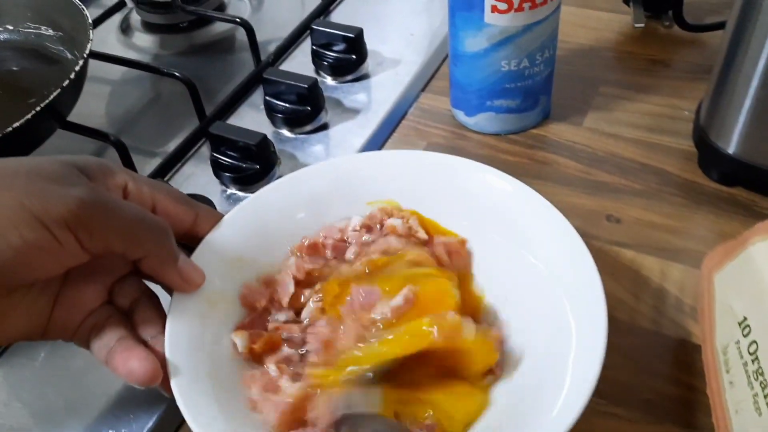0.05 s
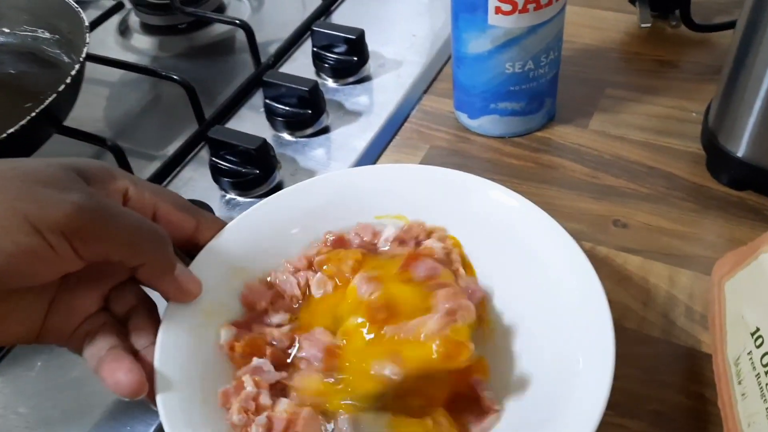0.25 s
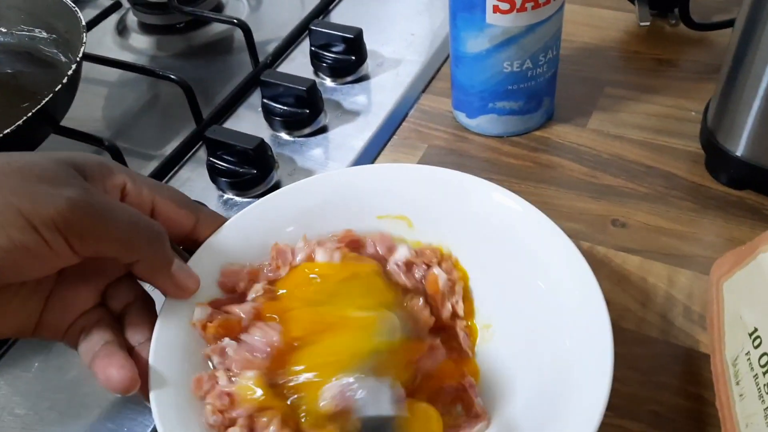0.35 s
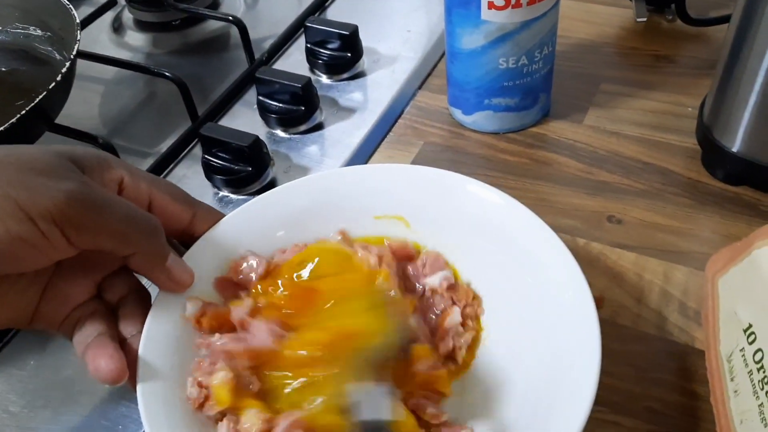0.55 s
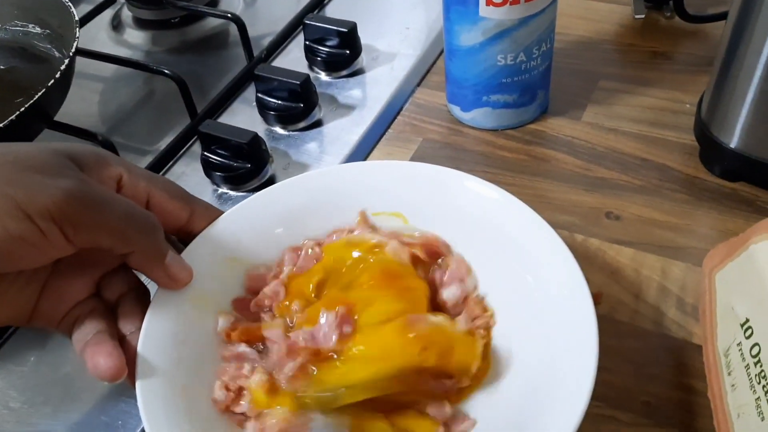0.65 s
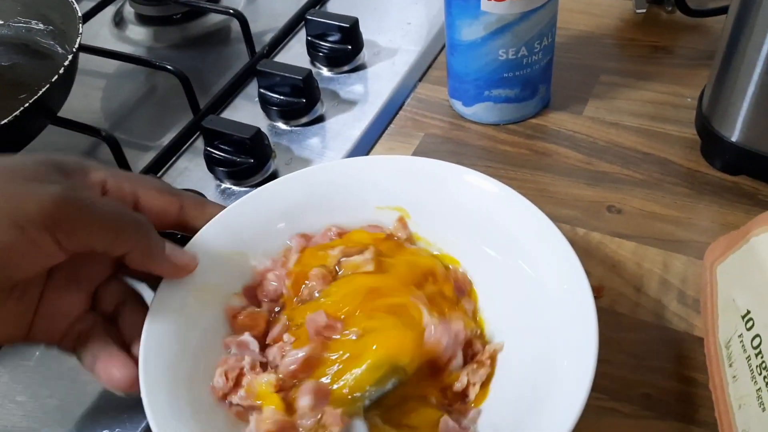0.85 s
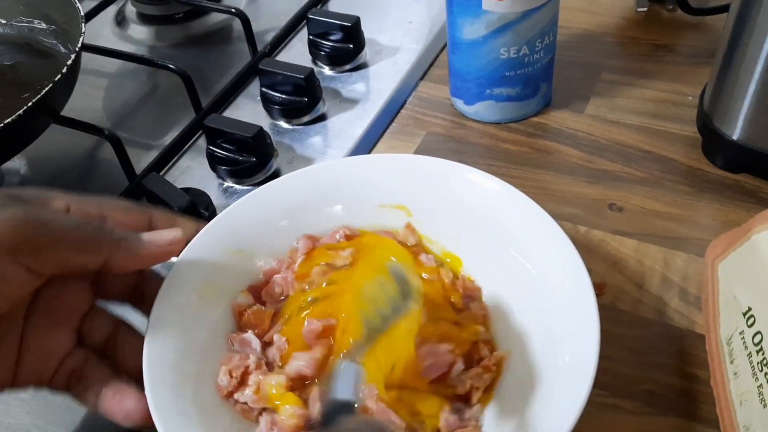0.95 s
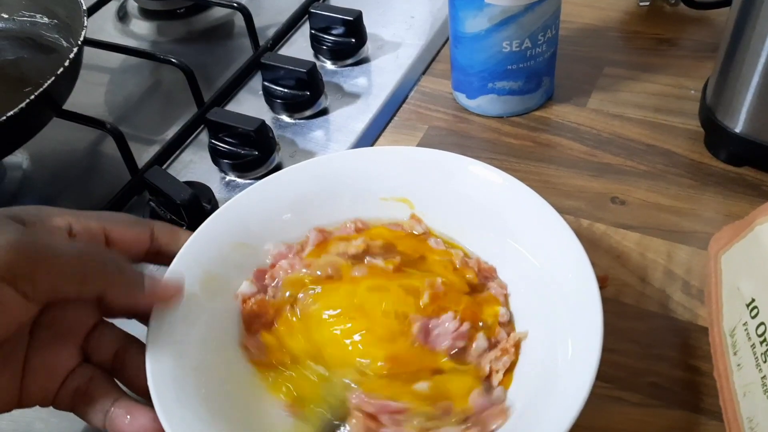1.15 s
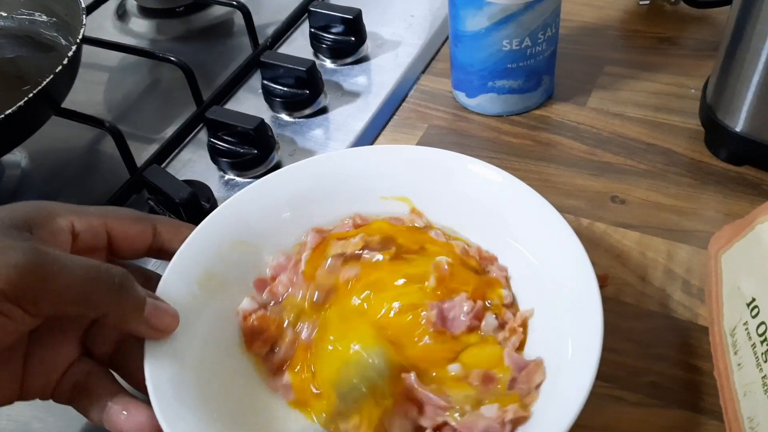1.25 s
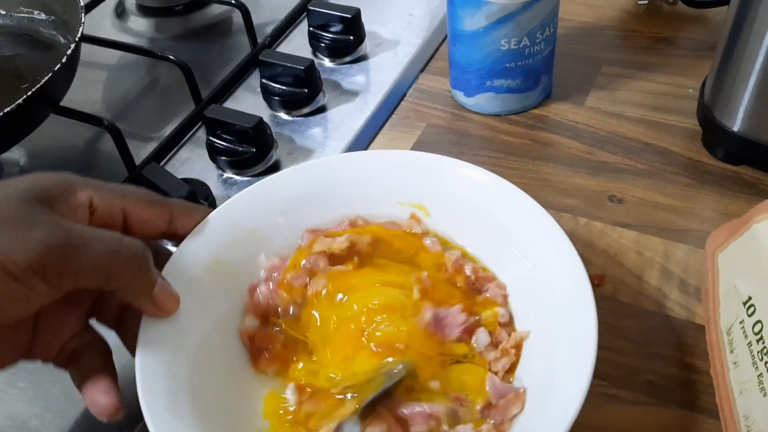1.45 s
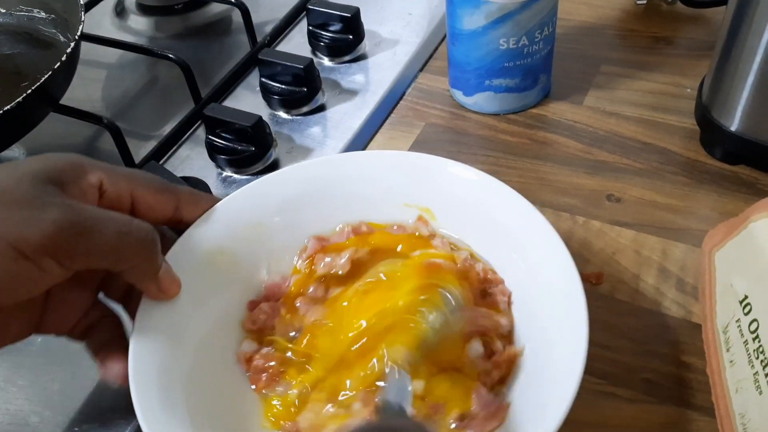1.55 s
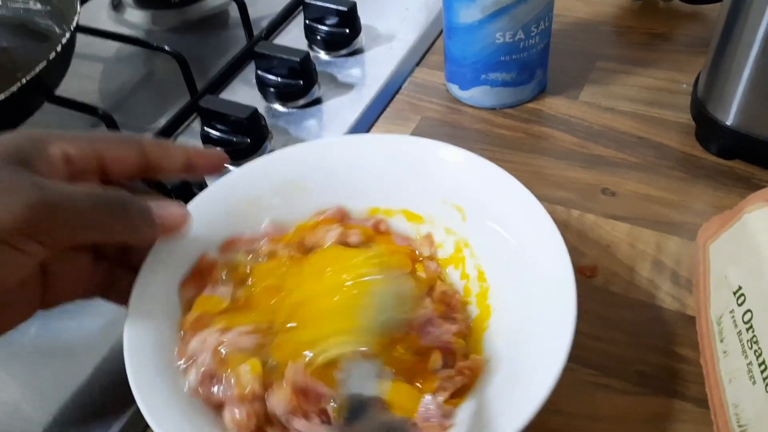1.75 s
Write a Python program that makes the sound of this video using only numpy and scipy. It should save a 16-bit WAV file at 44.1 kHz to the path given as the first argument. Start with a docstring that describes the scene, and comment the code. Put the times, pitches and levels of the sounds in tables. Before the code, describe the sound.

A metal fork beats eggs and diced meat in a ceramic bowl, close up, ticks mostly left. Irregular bright ticks run from 0.03 to 0.82 seconds, strongest near 0.24 and 0.46, with wet slop, a loud double plop at 0.5 and soft wooden thumps. After a lull, a clink rings at 1.12. Faint plops, scraping and light ticks follow around 1.5-1.8. Short kitchen echoes, low steady hum.

```python
"""A metal fork ticks on a ceramic bowl from the start, amid the wet slop of a thick mix, over a soft steady hum.
The fork beats eggs and diced meat; the bowl is held on a wooden worktop in a small kitchen.
Hum and slop are coloured noise and tiny ringing grains; ticks and scrapes are shaped noise.
Air pockets plop as rising tones with splatter and bowl modes; low modes make the worktop boom.
A close pair of microphones hears it all, with echoes made from fading noise."""
import sys
import numpy as np
from scipy import signal
from scipy.fft import rfft, irfft
from scipy.io import wavfile

SR = 44100
rng = np.random.default_rng(int(sys.argv[2]) if len(sys.argv) > 2 else 0)


def store_wav(level_fs):
    """Save 16-bit WAV to argv[1]."""
    pcm = np.round(np.clip(np.atleast_2d(level_fs), -1, 1) * 32767)
    wavfile.write(sys.argv[1], SR, pcm.T.astype(np.int16))


def to_linear_factor(level_db):
    """Convert decibel levels (scalar or array-like) to linear amplitude factors."""
    exponent = np.asarray(level_db, float) / 20
    return 10 ** exponent


N = 79380  # length in samples, 1.8 s


def rms_one(x):
    """Scale a sound so that its average strength (rms) is 1."""
    return x / np.sqrt(np.mean(x ** 2) + 1e-20)


def at_hz(points, hz):
    """Read a table between its points, on a log-frequency axis."""
    table_hz, values = np.transpose(points)
    return np.interp(np.log(np.maximum(hz, 1)), np.log(table_hz), values)


def shaped(x, spectrum, tilt_db=0):
    """Colour a sound by a spectrum, plus a tilt in dB per octave that pivots at 4 kHz."""
    size = x.shape[-1]
    hz = np.arange(size // 2 + 1) * SR / size
    tilt = tilt_db * np.log2(np.clip(hz, 300, None) / 4000)
    return irfft(rfft(x) * to_linear_factor(at_hz(spectrum, hz) + tilt), size)


def ring(clicks, hz, t60):
    """A resonance: each unit click starts a sine of height 1 that falls 60 dB in t60 (at least 2 ms)."""
    shrink = to_linear_factor(-60 / (max(t60, 0.002) * SR))  # loss per sample
    turn = 2 * np.pi * hz / SR
    feedback = [1, -2 * shrink * np.cos(turn), shrink * shrink]
    return signal.lfilter([0, np.sin(turn)], feedback, clicks + 1e-18)


def add(out, x, start_s, pan_db):
    """Place a sound at a time; pan_db is how much louder the left is than the right."""
    i = int(start_s * SR)
    out[:, i:i + len(x)] += x[:N - i] * to_linear_factor([[pan_db / 2], [-pan_db / 2]])


def right_late(x, lead_s):
    """Sound reaches the right microphone later: delay that channel by lead_s seconds."""
    bins = np.arange(N // 2 + 1)
    delay = np.exp(-2j * np.pi * lead_s * SR * bins / N)
    return np.array([x[0], irfft(rfft(x[1]) * delay, N)])


# How alike left and right are when sound comes from all around.
# Each row: frequency in Hz, likeness (0 unrelated, 1 identical).
LIKENESS = [(60, 0.42), (200, 0.91), (500, 0.41), (1000, 0)]


def diffuse(size):
    """Noise from all around: left and right share the bass and differ in the treble."""
    mid, side = rfft(rng.standard_normal((2, size)))
    alike = np.clip(at_hz(LIKENESS, np.arange(size // 2 + 1) * SR / size), -1, 1)
    both = np.sqrt(1 + alike) * mid + np.sqrt(1 - alike) * side * [[1], [-1]]
    return irfft(both, size) / np.sqrt(2)


# Colour of the room hum. Each row: frequency in Hz, relative level in dB per Hz.
HUM_COLOUR = [(100, -2.5), (350, 4.5), (560, -24), (750, -14), (1000, -15), (1900, -22), (2800, -8),
              (4000, -23), (6500, -10), (10000, -21)]


def hum():
    """Steady quiet room sound: coloured noise from all around."""
    level_db = -63
    return to_linear_factor(level_db) * rms_one(shaped(diffuse(N), HUM_COLOUR))


# Loudness of the mix moving under the fork. Each row: time in seconds, level in dB.
SLOP_LEVEL = [(0, -50.5), (0.089, -59), (0.118, -46), (0.198, -55), (.3, -48.5), (.42, -53.5),
              (0.482, -34.5), (.54, -43), (.62, -43), (.72, -64), (0.799, -59), (.95, -69), (1.06, -110),
              (1.17, -54), (1.27, -64.5), (1.5, -65), (1.6, -63), (1.67, -50.5), (1.8, -55.5)]
# Colour of the wet mix, also used for the splatter of the plops.
# Each row: frequency in Hz, relative level in dB per Hz.
WET_COLOUR = [(150, -48), (300, -0.5), (545, -24.5), (612, -5.5), (1310, -8.5), (16000, -48.5)]


def slop():
    """Dense wet grains, each a short decaying ring, get louder and softer with the stirring."""
    grains_per_s, size_db, cycles = 3000, 5, 2.8  # cycles sets how long a grain rings
    sizes = to_linear_factor(size_db * np.minimum(rng.exponential(1, N), 5)) * rng.choice([-1, 1], N)
    sizes = sizes * (rng.random(N) < grains_per_s / SR)
    pitches = np.geomspace(200, 15000, 24)  # Hz
    dealt = rng.integers(0, 24, N)  # which pitch each grain gets
    rings = np.zeros(N)
    for k, hz in enumerate(pitches):
        grains = rms_one(ring(sizes * (dealt == k), hz, cycles / hz))
        rings += grains * np.sqrt(hz) * to_linear_factor(at_hz(WET_COLOUR, hz))  # root: wider bands hold more
    times, db = np.transpose(SLOP_LEVEL)
    return to_linear_factor(np.interp(np.arange(N) / SR, times, db)) * rms_one(rings)


# How long echoes last. Each row: frequency in Hz, time to fall 60 dB in seconds.
ROOM_T60 = [(80, 0.46), (210, 0.3), (1470, 0.22), (10200, 0.27)]
# Colour of the echoes. Each row: frequency in Hz, level in dB.
ROOM_COLOUR = [(60, -6), (500, 3), (3000, 7)]


def kitchen(x):
    """Walls return many overlapping echoes: noise that dies away at its own rate in each band."""
    level_db, gap_s = -6.5, 0.001
    t = np.arange(SR // 2) / SR
    edges = 50 * 2 ** np.arange(0, 8.6, 0.7)  # band edges, Hz
    white = diffuse(len(t)), diffuse(len(t))  # neighbouring bands take turns
    tail = 0
    for k, (low, high) in enumerate(zip(edges, edges[1:])):
        hz = np.sqrt(low * high)
        band_filter = signal.butter(2, [low, high], "band", fs=SR, output="sos")
        band = signal.sosfilt(band_filter, white[k % 2])
        tail = tail + band * to_linear_factor(at_hz(ROOM_COLOUR, hz) - 60 * t / at_hz(ROOM_T60, hz))
    tail = tail * np.clip(t / gap_s - 1, 0, 1)  # silent for one gap, then fades in over another
    return to_linear_factor(level_db) * signal.fftconvolve(x[None], tail / np.sqrt(0.02 * SR), axes=1)[:, :N]


# Tines touching the glaze. Each row: start in seconds, level in dB, left over right in dB,
# treble tilt in dB per octave.
TICKS = [(0.0354, -25, 5.5, 5), (0.0765, -20.5, 8, 4), (0.236, -11, 10.5, 3), (0.2948, -22.5, 1, 0),
         (0.357, -28, -2, 3), (0.438, -32, 14, -1), (0.4574, -12, 7, 3), (0.6094, -28.5, 15, 2),
         (0.6834, -16, 13.5, 2), (0.796, -29, 3.5, 0.5), (0.821, -17.5, 14, 5), (1.102, -37.5, 7.5, 8),
         (1.1238, -18.5, 10, 8), (1.6413, -27, 9.5, 7.5), (1.6893, -41.5, 20.5, 7)]
# Colour of a tick. Each row: frequency in Hz, relative level in dB per Hz.
TICK_COLOUR = [(300, -23), (1170, 2), (1640, -4.5), (2360, 7), (3350, -13), (6000, -5.5), (7200, -13),
               (8500, -7.5), (9550, -18), (11500, -14.5), (16000, -14)]


def ticks():
    """Short bursts of tine chatter as noise; also the bare knocks that the walls return."""
    rise_s, t60_s, echo_db = 0.00076, 0.018, 13
    out, knocks = np.zeros((2, N)), np.zeros((2, N))
    t = np.arange(4096) / SR
    shape = (1 - np.exp(-t / rise_s)) ** 2 * to_linear_factor(-60 * t / t60_s)
    click = np.eye(1, len(t), k=64)[0]
    for start_s, db, pan_db, tilt_db in TICKS:
        chatter = rms_one(shaped(rng.standard_normal(len(t)), TICK_COLOUR, tilt_db))
        add(out, to_linear_factor(db) * shape * chatter, start_s, pan_db)
        knock = shaped(click, TICK_COLOUR, tilt_db)
        knock = knock / np.sqrt(np.sum(knock ** 2))  # unit energy
        add(knocks, to_linear_factor(db + echo_db) * knock, start_s, 0)
    return out, knocks[0]


# Air pockets closing in the mix. Each row: start in seconds, level in dB, starting pitch in Hz,
# time to fall 60 dB in seconds.
PLOPS = [(0.059, -36, 1883, 0.15), (0.074, -33, 1395, 0.083), (0.098, -34, 367, 0.081),
         (0.238, -24.5, 329.8, 0.22), (0.245, -13, 405, 0.043), (0.362, -24, 324, 0.075),
         (0.456, -32, 242, 0.086), (0.498, -4, 602, 0.025), (0.5, -14, 1450, 0.026),
         (0.506, -4.5, 318, 0.026), (0.5165, -24, 746, 0.018), (0.632, -28, 1950, 0.019),
         (0.6407, -12, 447, 0.025), (0.683, -14.5, 1180, 0.018), (0.694, -22.5, 336, 0.043),
         (0.712, -30, 2180, 0.035), (0.813, -27, 894, 0.052), (0.821, -21, 1705, 0.014),
         (0.925, -36, 306.5, 0.061), (1.104, -45.5, 1043, 0.056), (1.124, -28.5, 311, 0.055),
         (1.126, -34, 734, 0.06), (1.255, -47, 1150, 0.025), (1.298, -53, 2050, 0.025),
         (1.576, -45, 2550, 0.01), (1.526, -40.5, 575, 0.034), (1.542, -37, 348, 0.068),
         (1.573, -39.5, 333, 0.05), (1.619, -37.5, 385, 0.032), (1.634, -40.5, 370, 0.05),
         (1.774, -43.5, 360, 0.21)]
# Tones of the bowl, damped by the mix. Each row: frequency in Hz, level in dB,
# time to fall 60 dB in seconds.
BOWL = [(343.4, -15.5, 0.065), (480, -15.5, 0.039), (576, -21, 0.088), (780.4, -19.5, 0.069),
        (1028, -9.5, 0.017), (1420, -28, 0.027)]


def plops():
    """Each pocket rings briefly with rising pitch, splatters, and knocks the bowl."""
    rise_per_s, attack_s, pan_db = 4.3, 0.001, 3
    splat_db, splat_t60_s, bowl_scatter_db = -12.5, 0.043, 0.5
    out, t = np.zeros((2, N)), np.arange(SR // 2) / SR
    click = np.eye(1, len(t))[0]
    modes = np.array([to_linear_factor(db) * ring(click, hz, t60) for hz, db, t60 in BOWL])
    attack = 1 - np.exp(-t / attack_s)
    stretch = 1 + rise_per_s * np.minimum(t, 0.1)  # runs the phase ahead, so the pitch climbs
    for start_s, db, hz, t60 in PLOPS:
        pocket = np.sin(2 * np.pi * hz * t * stretch) * to_linear_factor(-60 * t / t60)
        white = rng.standard_normal(len(t))
        splat = to_linear_factor(splat_db - 60 * t / splat_t60_s) * rms_one(shaped(white, WET_COLOUR))
        strength = to_linear_factor(bowl_scatter_db * rng.standard_normal(len(modes)))
        bowl = (strength * rng.choice([-1, 1], len(modes))) @ modes
        add(out, to_linear_factor(db) * attack * (pocket + splat + bowl), start_s, pan_db)
    return out


# The bowl rocking on the worktop. Each row: start in seconds, level in dB.
THUMPS = [(0.11, -49), (0.242, -32.5), (0.282, -35.5), (0.459, -40), (0.508, -31), (0.549, -34),
          (0.649, -36.5), (0.712, -40.5), (0.831, -39), (.87, -41.5), (1.13, -40), (1.538, -45)]
# Low tones of the worktop. Each row: frequency in Hz, level in dB, time to fall 60 dB in seconds.
WORKTOP = [(106, 2.5, 0.18), (186, -9.5, 0.44), (69.5, -10.5, 0.12)]


def thumps():
    """Soft pushes set the low modes of the wooden worktop booming."""
    rise_s = 0.0089
    out, t = np.zeros((2, N)), np.arange(SR // 2) / SR
    for start_s, db in THUMPS:
        boom = np.zeros(len(t))
        for hz, mode_db, t60 in WORKTOP:
            phase = rng.uniform(0, 2 * np.pi)
            boom += to_linear_factor(mode_db - 60 * t / t60) * np.sin(2 * np.pi * hz * t + phase)
        add(out, to_linear_factor(db) * (1 - np.exp(-t / rise_s)) * boom, start_s, 0)
    return out


# Tines dragging over the glaze. Each row: start in seconds, length in seconds, level in dB.
SCRAPES = [(0.61, 0.016, -42), (1.117, 0.029, -38.5), (1.61, 0.35, -58.5)]
# Colour of a scrape. Each row: frequency in Hz, relative level in dB per Hz.
SCRAPE_COLOUR = [(1200, -19.5), (3900, 17), (5500, 6.5), (16000, -26.5)]
# A dragged tine singing faintly. Each row: start in seconds, length in seconds, level in dB.
SQUEAKS = [(1.01, 0.035, -67), (1.598, 0.2, -63)]


def scrapes():
    """Rough slips make noise or set a tine singing; each swells fast and fades over the stroke."""
    squeak_hz, squeak_t60_s = 3830, 0.03
    out = np.zeros((2, N))
    rough = rng.standard_normal(2 * N) * to_linear_factor(2.1 * rng.exponential(1, 2 * N))
    slips = rms_one(shaped(rough, SCRAPE_COLOUR))
    song = rms_one(ring(rough, squeak_hz, squeak_t60_s))
    for strokes, sound in (SCRAPES, slips), (SQUEAKS, song):
        for start_s, length_s, db in strokes:
            u = np.arange(int(length_s * SR)) / (length_s * SR)  # 0 to 1 along the stroke
            piece = sound[int(start_s * SR):][:len(u)]
            add(out, to_linear_factor(db) * np.sin(np.pi * u ** 0.21) * piece, start_s, 0)
    return out


# One touch that leaves the fork free to ring: start in seconds, level in dB, left over right in dB.
CLINK = (1.1245, -18.5, -7)
# Tones of the fork. Each row: frequency in Hz, level in dB, time to fall 60 dB in seconds.
FORK = [(6330, 4, 0.04), (6700, -14, 0.03)]


def clink():
    """The freed fork rings at two close modes, fading in over 1.3 ms."""
    start_s, db, pan_db = CLINK
    out, click = np.zeros((2, N)), np.eye(1, SR // 2)[0]
    fork = sum(to_linear_factor(mode_db) * ring(click, hz, t60) for hz, mode_db, t60 in FORK)
    fade_in = np.minimum(np.arange(SR // 2) / (0.0013 * SR), 1)
    add(out, to_linear_factor(db) * fork * fade_in, start_s, pan_db)
    return out


def scene():
    """Bowl sounds reach the left microphone first; the room answers, over the hum."""
    metal_lead_s, wet_lead_s = 0.000169, 0.00024
    chatter, knocks = ticks()
    metal = clink() + scrapes()
    wet = plops() + thumps() + slop()
    near = right_late(chatter + metal, metal_lead_s) + right_late(wet, wet_lead_s)
    echoes = kitchen((metal + wet).mean(axis=0) + knocks)
    return near + echoes + hum()


def band_limit(x):
    """A steep low-pass at the top of the band."""
    return signal.sosfilt(signal.butter(12, 16960, fs=SR, output="sos"), x)


def record(dry):
    """Filters take away the extreme treble and the deepest bass."""
    treble_cut = signal.cheby2(8, 25, 15900, fs=SR, output="sos")  # 25 dB down from 15900 Hz
    bass_cut = signal.butter(3, 60, "high", fs=SR, output="sos")  # below 60 Hz
    mix = signal.sosfilt(bass_cut, signal.sosfilt(treble_cut, dry))
    return band_limit(mix)


dry = scene()
out = record(dry)
store_wav(out)
```